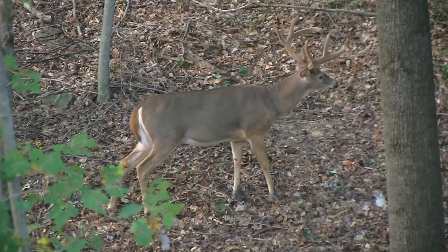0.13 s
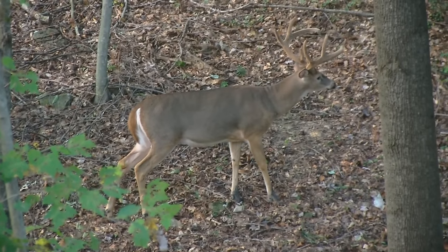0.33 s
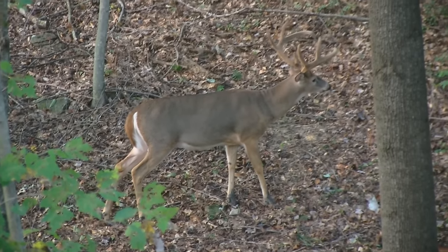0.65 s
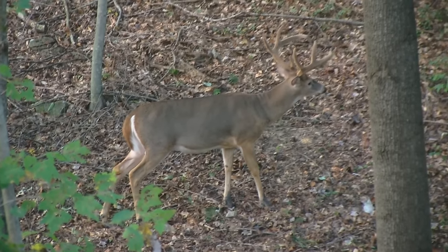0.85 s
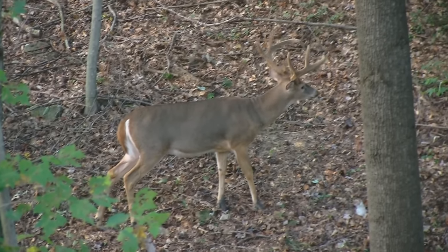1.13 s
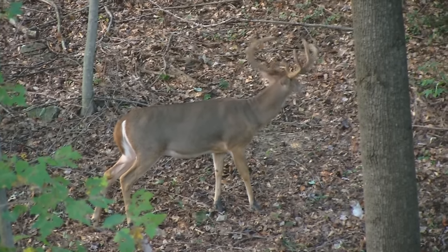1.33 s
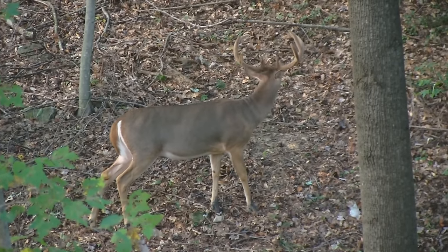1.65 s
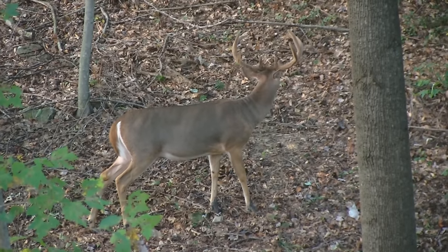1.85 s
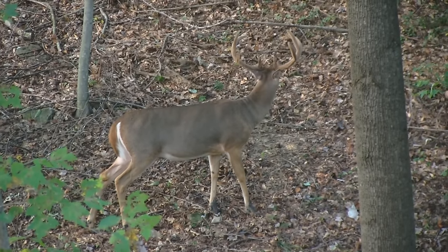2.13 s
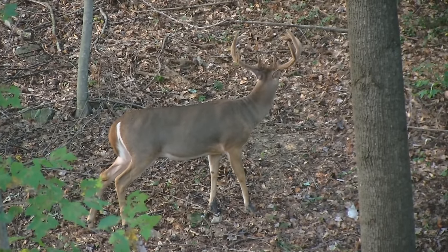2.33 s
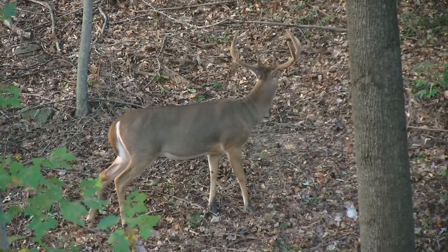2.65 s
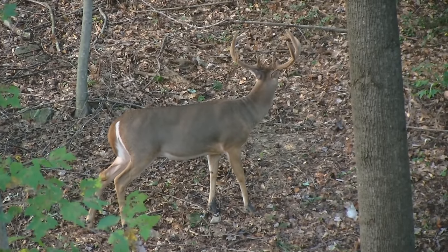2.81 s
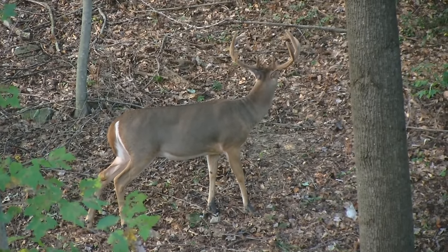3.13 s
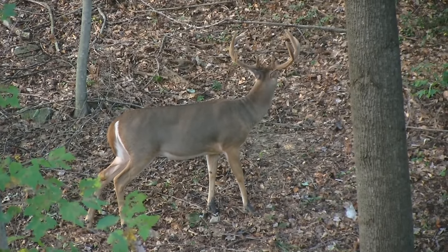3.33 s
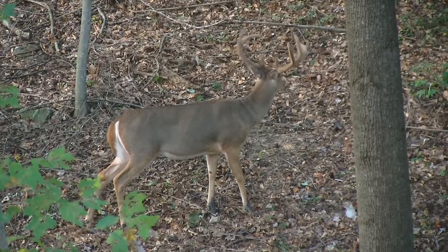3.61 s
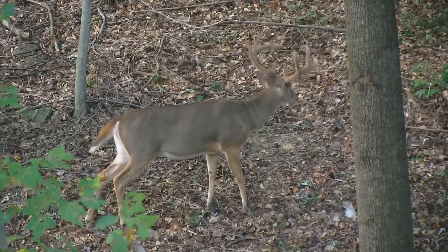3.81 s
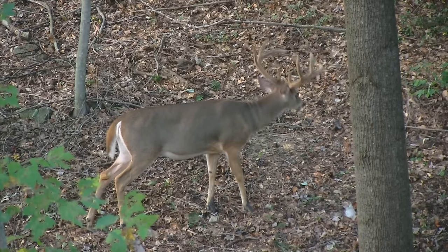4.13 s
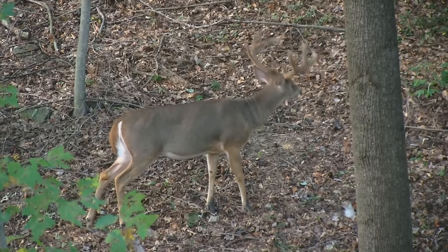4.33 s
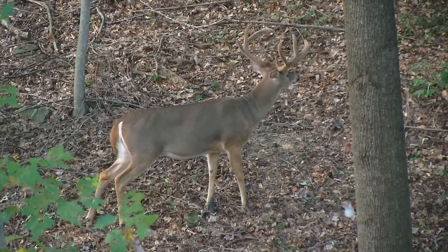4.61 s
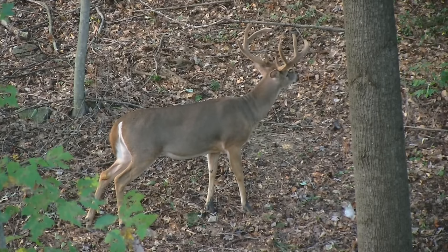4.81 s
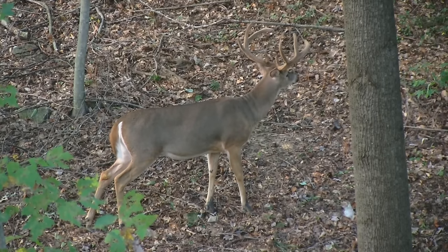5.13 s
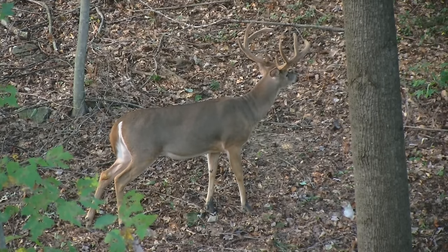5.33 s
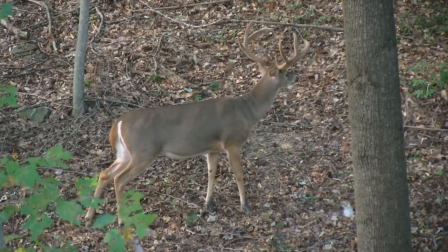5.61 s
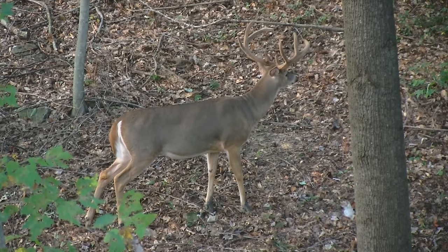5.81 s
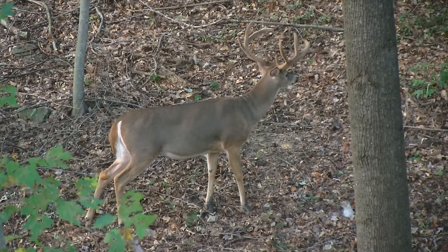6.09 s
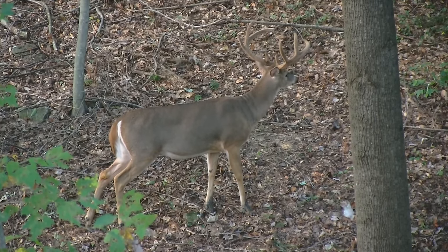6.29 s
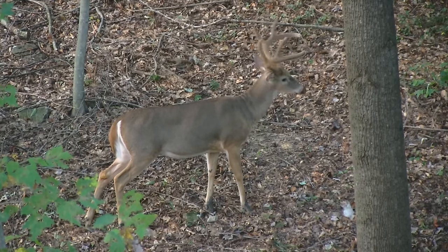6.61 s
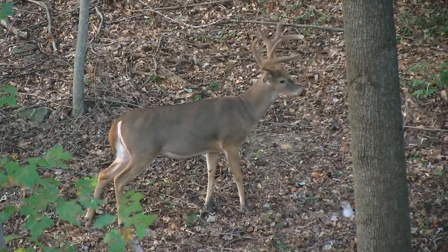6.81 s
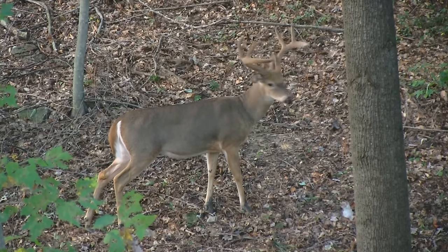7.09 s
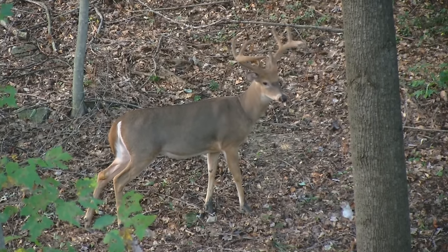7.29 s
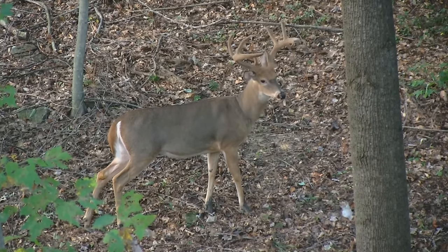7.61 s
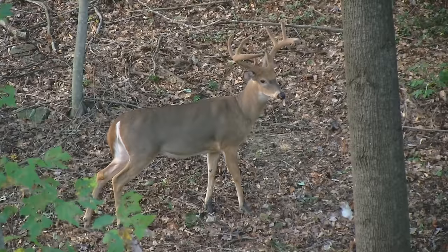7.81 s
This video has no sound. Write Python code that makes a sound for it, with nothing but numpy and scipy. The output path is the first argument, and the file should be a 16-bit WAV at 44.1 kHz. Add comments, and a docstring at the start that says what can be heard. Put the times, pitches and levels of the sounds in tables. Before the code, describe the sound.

In quiet summer woods where a buck stands, a close cicada buzzes harshly while a few low gusts bump the microphone. It slows into a duller rattle and stops. A second, farther cicada quits about a second later, leaving a distant throbbing chorus. A twig snaps, with two fainter snaps after. Sound is on the left only, with faint hiss on the right.

```python
"""First a cicada close to the microphone, its tymbal clicks ringing its body; it slows, dulls and stops.
A second, farther off, stops about a second later, leaving a distant chorus with a throbbing lower part.
Shaped noise makes the gusts and the hush of the woods; steady sines make a faint electrical hum.
A distant bird's gliding sines slur faintly; a twig's short ring and crack snap once, then twice fainter.
One microphone feeds the left channel only; the right carries just preamplifier hiss."""
import sys
import numpy as np
from scipy import signal
from scipy.fft import rfft, irfft, next_fast_len
from scipy.io import wavfile
from scipy.ndimage import map_coordinates

SR = 44100
rng = np.random.default_rng(int(sys.argv[2]) if len(sys.argv) > 2 else 0)


def generate_wav(signal):
    """Clip the signal to [-1, 1] and save it as 16-bit WAV at the path in sys.argv[1]."""
    frames = np.transpose(np.atleast_2d(signal))
    scaled = np.clip(frames, -1, 1) * 32767
    pcm = np.round(scaled).astype(np.int16)
    wavfile.write(sys.argv[1], SR, pcm)


N = 350595

# Near cicada's tymbal muscles, before a small drift: [t/s, click rate/Hz, unevenness/cycle]
TYMBAL_STROKES = [(0, 333, 0.18), (1.2, 331, .15), (1.7, 316, 0.27), (2.45, 289, 0.24), (2.8, 228, .05),
                  (3.5, 209, 0.023), (4.4, 182, 0.049)]
# Cicada body, closed and dark at both ends: [f/Hz, relative level per Hz/dB]
BODY_RESPONSE = [(1800, -42.5), (2500, -25.5), (3500, -12.5), (4000, -6.5), (5200, -2), (5600, -4),
                 (6050, 0.5), (6550, -1.9), (7500, -8.5), (9500, -14), (10400, -27.5), (12000, -35),
                 (15500, -43.5)]
# Pumping of the near cicada's abdomen: [t/s, pump rate/Hz]
ABDOMEN_PUMPING = [(0, 9.2), (.7, 7.9), (1.35, 10.2), (2.5, 9.3)]
# Brief falters as the near cicada runs down: [t/s, half width/s, level change/dB]
SONG_FALTERS = [(3.24, .04, -1.5), (3.73, .025, -2), (4.08, 0.053, -6)]
# Outline of the far chorus, three voices standing out: [f/Hz, relative level per Hz/dB]
CHORUS_OUTLINE = [(1900, -44), (2800, -21), (3750, -15.5), (4350, -2), (4700, 1), (5000, -2), (5500, -7.5),
                  (6100, -6.3), (6650, -.5), (7100, -6), (7450, -4.6), (8600, -14.7), (9600, -14.5),
                  (10400, -26), (14000, -38)]
# Lower part of the far chorus: [t/s, relative level/dB, throb depth either way/dB]
CHORUS_THROB = [(4.2, -0.5, 0.2), (5.6, -1, 1.5), (7.9, 0, 1.3)]
# Air moving at the microphone: [f/Hz, relative level per Hz/dB]
RUMBLE_OUTLINE = [(5, -28), (11, -14), (20, 5), (33, -10), (46, -12.5), (70, -34), (140, -56), (400, -100)]
# Gusts at the microphone: [t/s, half width/s, rise/dB]
BREEZE_GUSTS = [(.13, 0.16, 11.5), (.62, 0.14, 9.5), (.9, 0.092, 15.5), (1.1, 0.1, 15), (1.38, 0.13, 7),
                (5.33, 0.036, 8.5)]
# Distant background of the woods: [f/Hz, relative level per Hz/dB]
HUSH_OUTLINE = [(30, -8), (100, 0.5), (220, -4), (350, -4.5), (550, -8.5), (1000, -9), (1700, -13.5),
                (4000, -13), (12000, -53)]
# One soft swell of that background: [t/s, half width/s, rise/dB]
HUSH_SWELLS = [(5.55, 0.12, 2.5)]
# Electrical hum, before a slow unsteadiness: [f/Hz, rms level/dB]
HUM_TONES = [(90.5, -75), (181, -81), (240, -82), (331, -83)]
# Distant bird's slurs: [t/s, length/s, start f/Hz, end f/Hz, direct peak level/dB]
BIRD_SLURS = [(3.205, 0.073, 1700, 1960, -66), (7.2, 0.058, 1660, 2090, -65), (7.413, .13, 2000, 1900, -71)]
# Twig snaps: [t/s, gain of the break/dB]
TWIG_SNAPS = [(5.8959, -36.5), (6.106, -52.5), (6.652, -64)]
# Ringing modes of the dry wood: [f/Hz, relative level/dB, time to fall 60 dB/s]
TWIG_MODES = [(990, -9, 0.013), (1260, -3.5, 0.01), (1840, -3, 0.0062), (2300, -3, .009), (2940, 0, 0.004),
              (3670, -20, 0.0054)]
# The snap as dulled by the leaf litter: [f/Hz, relative level per Hz/dB]
LITTER_RESPONSE = [(300, -35), (650, -13), (1000, 0), (3500, 7.5), (5000, -13), (12000, -32)]

# Near cicada: full song until it tires, a step down, a steady sag and a quick release
SONG_DB, TIRES_S, STOPS_S = -37.5, 2.56, 4.23
STEP_DB, STEP_S, SAG_DB_PER_S, RELEASE_DB_PER_S = 2.5, 0.033, 3, 88
# Its treble lift at full effort, and extra treble lost per dB of lost effort
BRIGHT_DB, DULLING = 0.4, 0.96
# Second cicada, farther off; its click rate drifts about the given one
NEIGHBOUR_DB, NEIGHBOUR_STOPS_S, NEIGHBOUR_RATE_HZ = -54.5, 5.33, 310
# Far chorus: starting level and slow ebb
CHORUS_DB, CHORUS_EBB_DB_PER_S = -48.5, 0.0631
# Air at the microphone: starting level without gusts, and how fast it calms
RUMBLE_DB, CALMING_DB_PER_S = -44, .7
HUSH_DB = -63.5  # the woods' background, before its swell and drift
HISS_DB, TOP_HZ = -65.5, 15750  # preamplifier hiss before the band limit, and that limit


def amp(db):
    """Decibels to gain."""
    return 10 ** (np.asarray(db) / 20)


def unit(x):
    """Scale to rms 1."""
    return x / np.sqrt(np.mean(x ** 2) + 1e-20)


def since(s):
    """Seconds gone by since a moment, zero before it."""
    return np.maximum(np.arange(N) / SR - s, 0)


def bumps(rows):
    """Sum of bell-shaped rises or dips in dB, one for each row of time, half width and height."""
    t = np.arange(N) / SR
    return sum(db * np.exp(-((t - s) / width) ** 2) for s, width, db in rows)


def curves(rows):
    """One value per sample for each column after the time."""
    s, *columns = np.transpose(rows)
    return [np.interp(np.arange(N) / SR, s, column) for column in columns]


def wobble(rate):
    """A smooth random curve with the given number of knots a second."""
    knots = rng.standard_normal(int(N * rate / SR) + 4)
    return map_coordinates(knots, [np.arange(N) * rate / SR])


def coloured(x, points):
    """Pass x through a causal minimum-phase filter with the given (Hz, dB) outline."""
    m = 2 * next_fast_len(N // 2 + SR // 2)
    hz, db = np.transpose(points)
    outline = np.interp(np.log(np.fft.rfftfreq(m, 1 / SR) + 1), np.log(hz), db)
    # folding the cepstrum onto positive time makes the filter causal
    cepstrum = irfft(np.log(amp(outline)), m)
    cepstrum[1:m // 2] *= 2
    cepstrum[m // 2 + 1:] = 0
    response = np.exp(rfft(cepstrum))
    return irfft(rfft(x, m) * response, m)[:N]


def split(x, hz, order):
    """The parts of x below and above a frequency."""
    m = next_fast_len(N + SR // 2)
    lowpass = 1 / (1 + (np.fft.rfftfreq(m, 1 / SR) / hz) ** order)
    low = irfft(rfft(x, m) * lowpass, m)[..., :N]
    return low, x - low


def trees(x, t60, wet_db):
    """Direct sound plus its dense scatter from trunks and leaves, as decaying noise."""
    t = np.arange(SR // 2) / SR
    tail = rng.standard_normal(len(t)) * np.exp(-np.log(1000) * t / t60)
    scatter = signal.fftconvolve(x, tail / np.linalg.norm(tail))[:N]
    return x + amp(wet_db) * scatter


def clicks(rate, jitter, scatter_db):
    """One click per tymbal stroke, uneven in time (share of a cycle) and size."""
    cycles = np.cumsum(rate) / SR
    chance = rng.standard_normal((4096, 2))[:int(cycles[-1])]
    stroke = np.arange(len(chance))
    slip = np.interp(stroke, cycles, jitter * np.ones(N)) * chance[:, 0]
    samples = np.searchsorted(cycles, stroke + slip)
    return np.bincount(samples, amp(scatter_db * chance[:, 1]), N + 1)[:N]


def near_cicada():
    """Tymbal clicks ring the body; the song trembles, then slows to an even rattle, dulls and stops."""
    tired = since(TIRES_S)
    step_db = STEP_DB * np.minimum(tired / STEP_S, 1)
    effort_db = bumps(SONG_FALTERS) - step_db - SAG_DB_PER_S * tired
    level_db = SONG_DB + effort_db - RELEASE_DB_PER_S * since(STOPS_S)
    lift_db = BRIGHT_DB + DULLING * effort_db
    rate, uneven = curves(TYMBAL_STROKES)
    rate = rate * (1 + .012 * wobble(9))
    # each stroke buckles the tymbal once strongly, while its ribs crackle in between
    strokes = unit(clicks(rate, jitter=uneven, scatter_db=2.0) / np.sqrt(rate))
    ribs = unit(clicks(rate, jitter=.4, scatter_db=4.0) / np.sqrt(rate))
    # the more even the strokes, the more the fine crackle bunches at the click rate
    bunch_depth_db = 3 * np.exp(-(uneven / .14) ** 2)
    bunching_db = bunch_depth_db * np.cos(2 * np.pi * np.cumsum(rate) / SR)
    crackle = amp(bunching_db) * rng.standard_normal(N)
    scattered = unit(trees(strokes + amp(-2.5) * ribs, t60=0.22, wet_db=2.5))
    buzz = scattered + amp(-2.5) * crackle
    low, high = split(unit(coloured(buzz, BODY_RESPONSE)), hz=6300, order=12)
    # the abdomen pumps unevenly, which shakes the treble most
    pump_rate, = curves(ABDOMEN_PUMPING)
    tremor = np.cos(2 * np.pi * np.cumsum(pump_rate) / SR) + 0.35 * wobble(27.9)
    treble_db = lift_db + 1.2 * tremor + .7 * wobble(14)
    return amp(level_db) * (low * amp(.7 * tremor) + high * amp(treble_db))


def neighbour_cicada():
    """The same kind of body, at a near-steady click rate, blurred by distance until its quick release."""
    rate = NEIGHBOUR_RATE_HZ * (1 + .03 * wobble(5))
    strokes = clicks(rate, jitter=.2, scatter_db=1.5)
    buzz = unit(coloured(trees(strokes, t60=0.38, wet_db=6), BODY_RESPONSE))
    return amp(NEIGHBOUR_DB - RELEASE_DB_PER_S * since(NEIGHBOUR_STOPS_S)) * buzz


def far_cicadas(count=4):
    """Several buzzes blur among the trees; their lower part rasps and throbs about nine times a second."""
    voices = np.zeros(N)
    for rate in np.linspace(285, 355, count):
        strokes = clicks(rate * (1 + .04 * wobble(5)), jitter=.12, scatter_db=2.5)
        voices += trees(strokes, t60=0.24, wet_db=5.5)
    blur = unit(voices) + amp(-4) * rng.standard_normal(N)
    low, high = split(unit(coloured(blur, CHORUS_OUTLINE)), hz=5570, order=24)
    voice_db, depth_db = curves(CHORUS_THROB)
    throb_db = depth_db * np.cos(2 * np.pi * (9.25 * np.arange(N) / SR + .33))
    # tymbal strokes still show in the lower part as a fast rasp
    rasp_cycles = np.cumsum(320 + 35 * wobble(30)) / SR
    rasp_db = 0.91 * depth_db * np.sin(2 * np.pi * rasp_cycles)
    low = low * amp(voice_db + throb_db + rasp_db + .3 * wobble(20))
    high = high * amp(0.26 * throb_db + 0.42 * wobble(22))
    return amp(CHORUS_DB - CHORUS_EBB_DB_PER_S * since(0)) * (low + high)


def air():
    """A dying breeze buffets the microphone in a few gusts, over the soft hush of the woods."""
    breeze_db = RUMBLE_DB - CALMING_DB_PER_S * since(0) + bumps(BREEZE_GUSTS)
    rumble = amp(breeze_db) * unit(coloured(rng.standard_normal(N), RUMBLE_OUTLINE))
    hush_db = HUSH_DB + bumps(HUSH_SWELLS) + 0.42 * wobble(2.9)
    hush = amp(hush_db) * unit(coloured(rng.standard_normal(N), HUSH_OUTLINE))
    return rumble + hush


def hum():
    """A few faint electrical tones, slightly unsteady in level and phase."""
    t = np.arange(N) / SR
    tones = np.zeros(N)
    for hz, db in HUM_TONES:
        peak = np.sqrt(2) * amp(db + wobble(0.71))
        tones += peak * np.sin(2 * np.pi * hz * t + 0.55 * wobble(1.72))
    return tones


def bird():
    """Soft whistles from far off, each gliding in pitch under a half-sine swell."""
    song = np.zeros(N)
    for s, length, start_hz, end_hz, db in BIRD_SLURS:
        n = round(length * SR)
        phase = 2 * np.pi * np.cumsum(np.linspace(start_hz, end_hz, n)) / SR
        swell = np.sin(np.linspace(0, np.pi, n))
        song[round(s * SR):][:n] += amp(db) * swell * np.sin(phase)
    return trees(song, t60=.3, wet_db=-10)


def twig():
    """Dry wood breaks with a noise crack and a very short ring of decaying modes."""
    t = np.arange(SR // 10) / SR
    ring = np.zeros(len(t))
    for hz, db, t60 in TWIG_MODES:
        ring += amp(db) * np.sin(2 * np.pi * hz * t) * np.exp(-np.log(1000) * t / t60)
    crack = .9 * rng.standard_normal(len(t)) * np.exp(-t / .001)
    breaks = np.zeros(N)
    for s, db in TWIG_SNAPS:
        breaks[round(s * SR)] = amp(db)
    snaps = coloured(signal.fftconvolve(breaks, ring + crack)[:N], LITTER_RESPONSE)
    return trees(snaps, t60=.16, wet_db=-8)


def scene():
    """The one microphone hears the whole woods and feeds the left channel alone."""
    cicadas = near_cicada() + neighbour_cicada() + far_cicadas()
    woods = cicadas + air() + hum() + bird() + twig()
    return np.array([woods, np.zeros(N)])


def record(dry):
    """Both preamplifiers add their own hiss, and a steep filter cuts all above the band limit."""
    hiss = amp(HISS_DB) * rng.standard_normal((2, N))
    below, _ = split(dry + hiss, TOP_HZ, order=400)
    return below


dry = scene()
out = record(dry)
generate_wav(out)
```